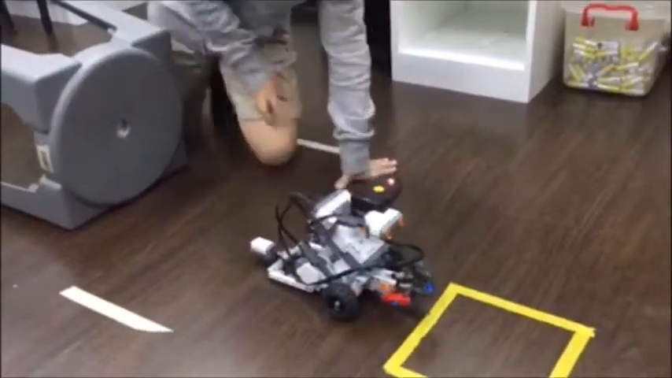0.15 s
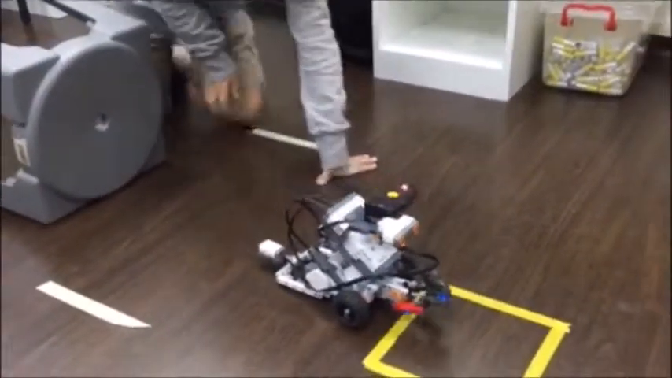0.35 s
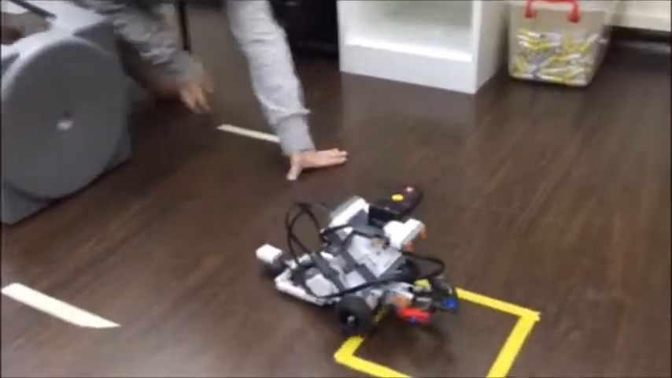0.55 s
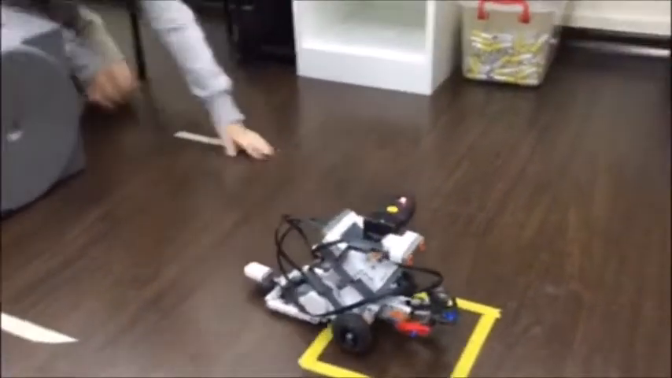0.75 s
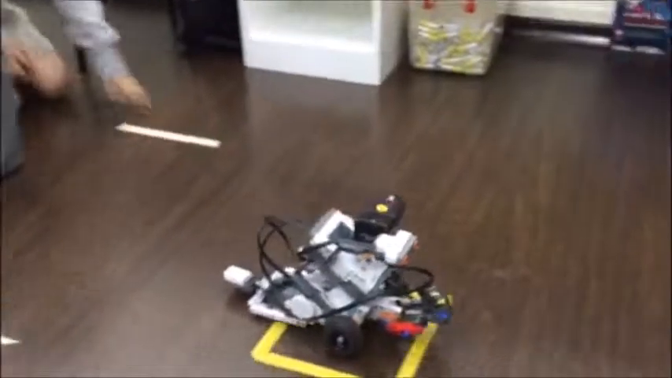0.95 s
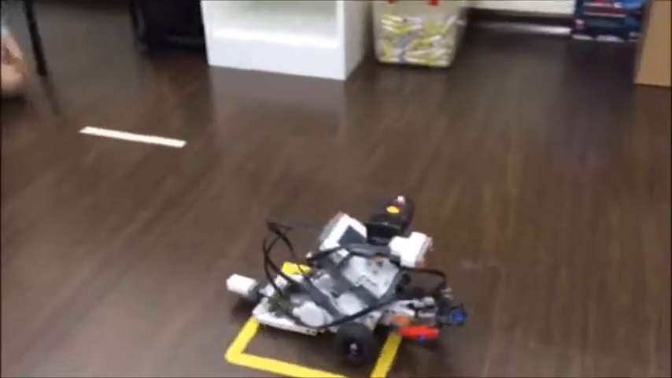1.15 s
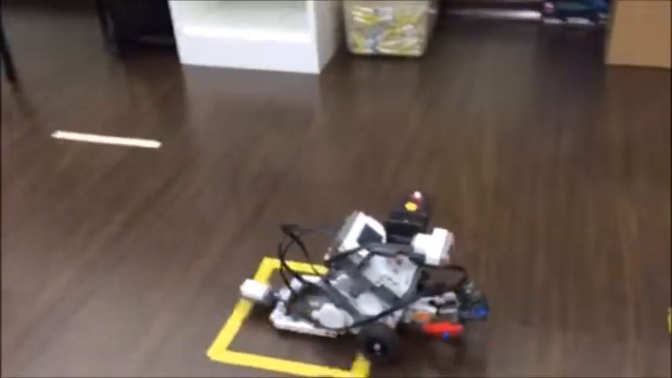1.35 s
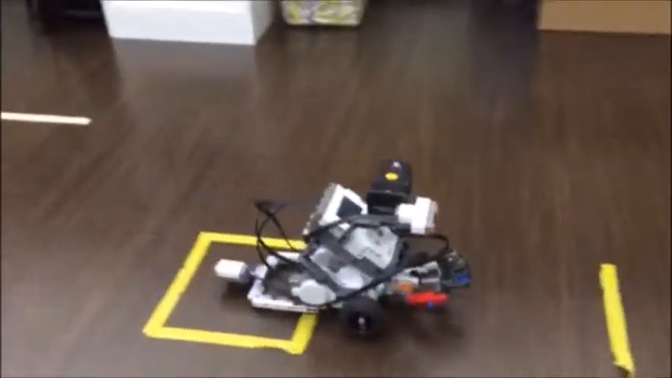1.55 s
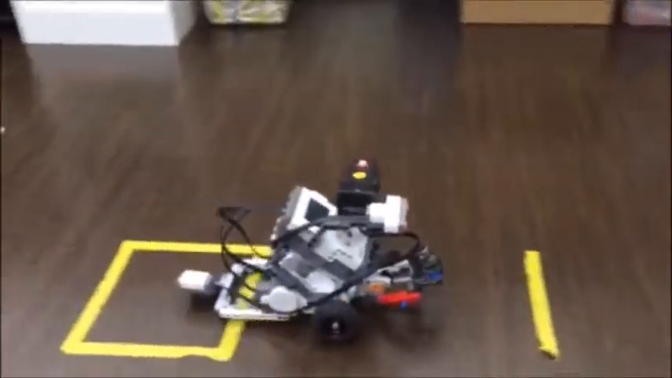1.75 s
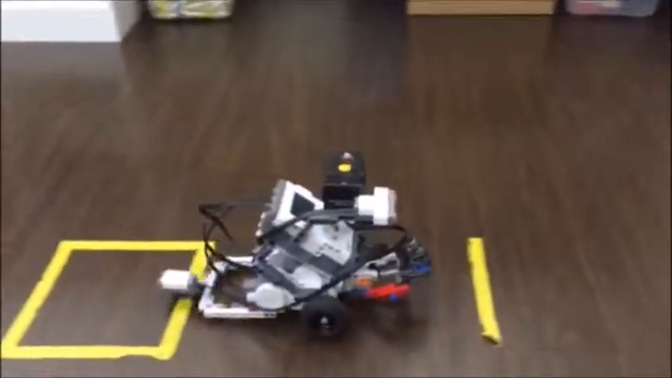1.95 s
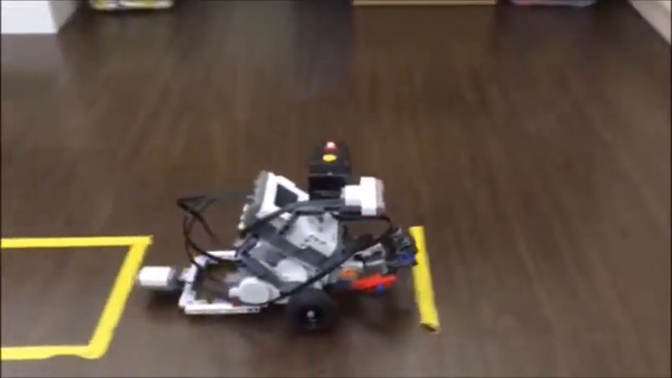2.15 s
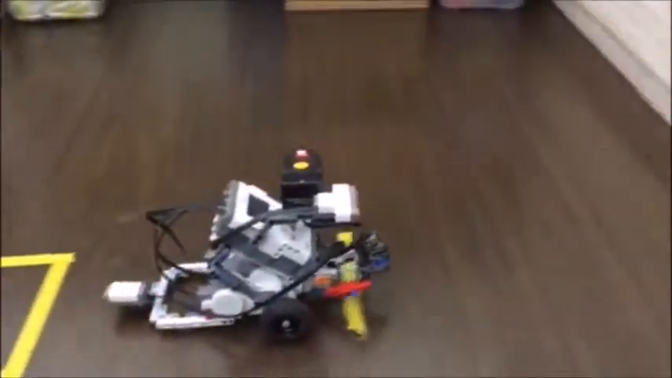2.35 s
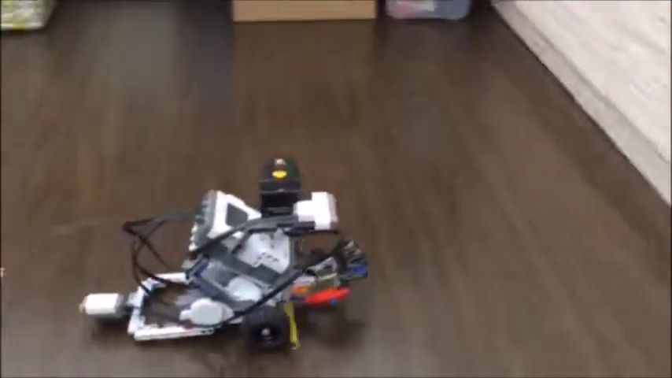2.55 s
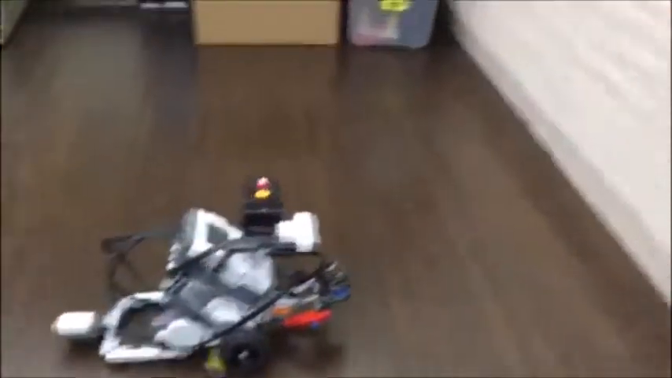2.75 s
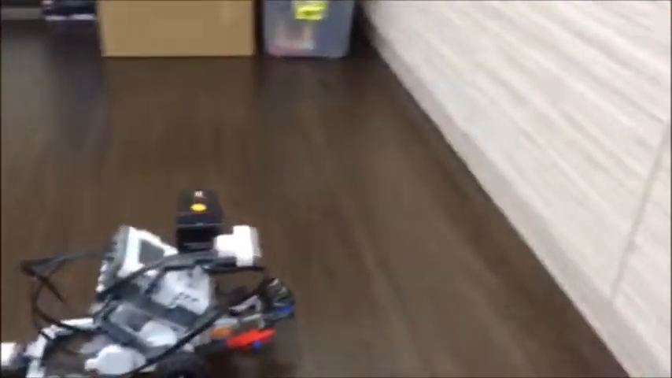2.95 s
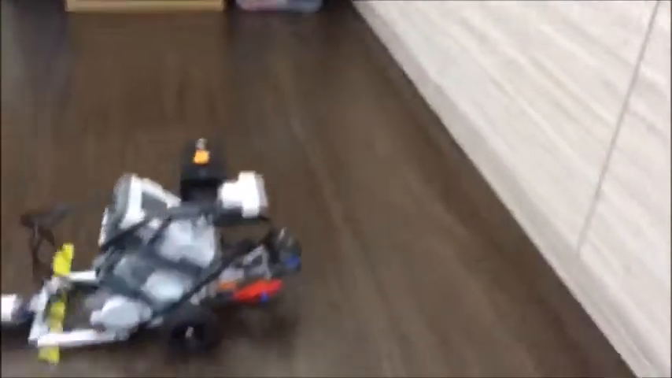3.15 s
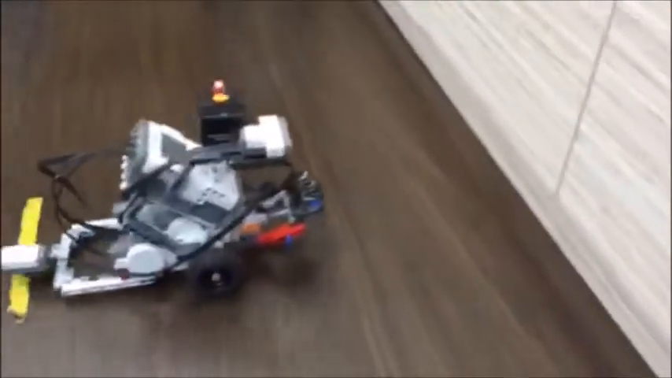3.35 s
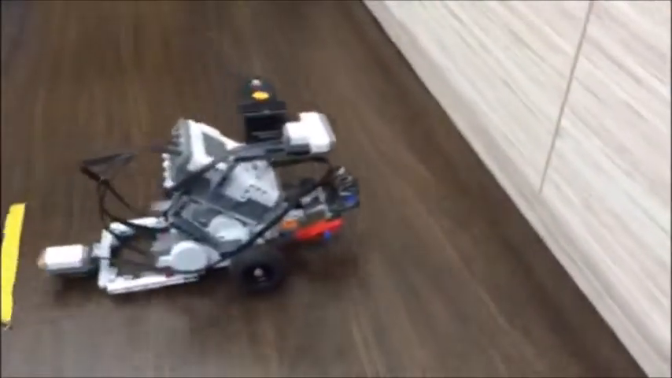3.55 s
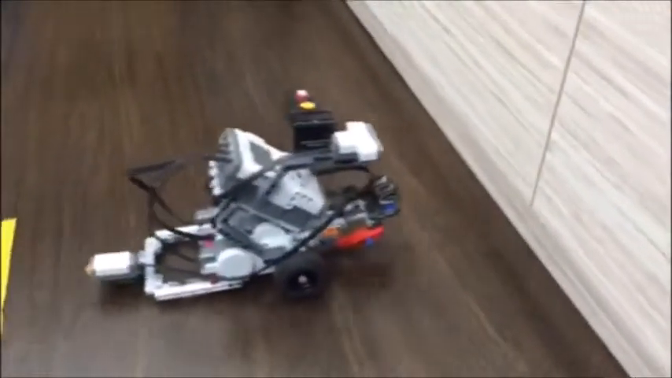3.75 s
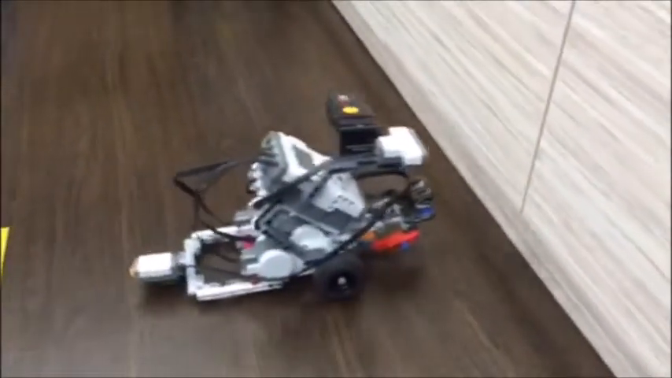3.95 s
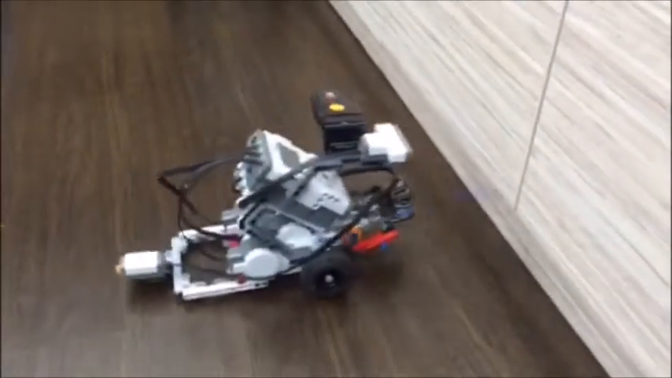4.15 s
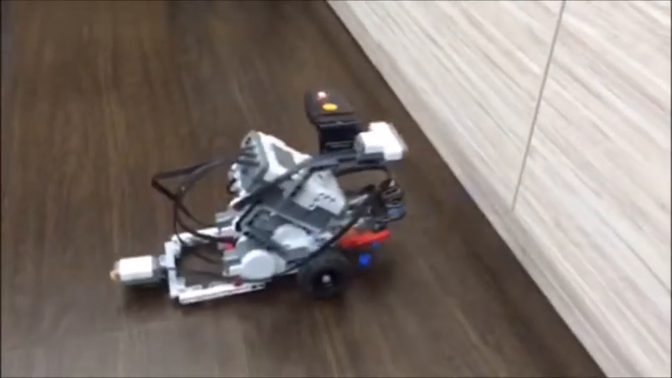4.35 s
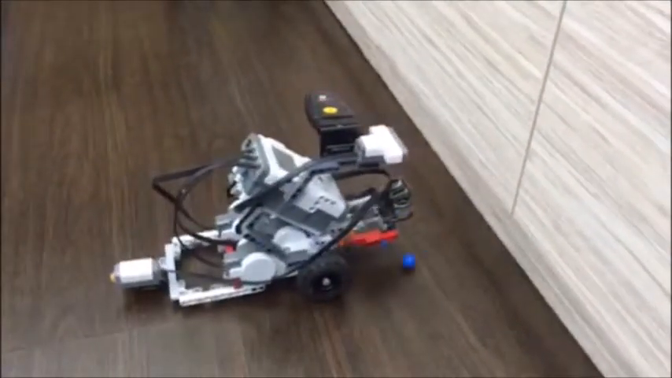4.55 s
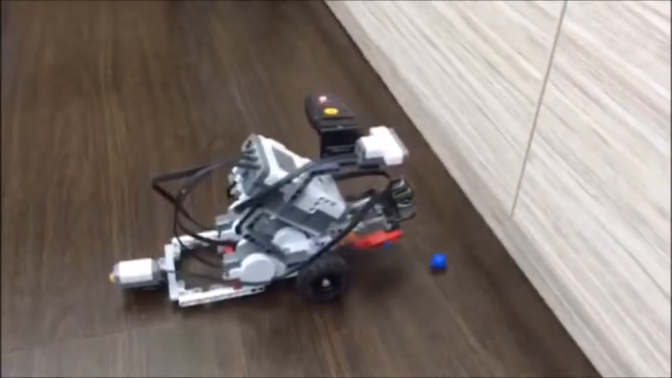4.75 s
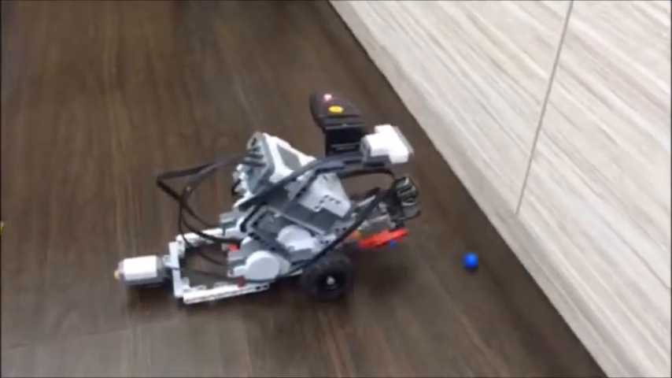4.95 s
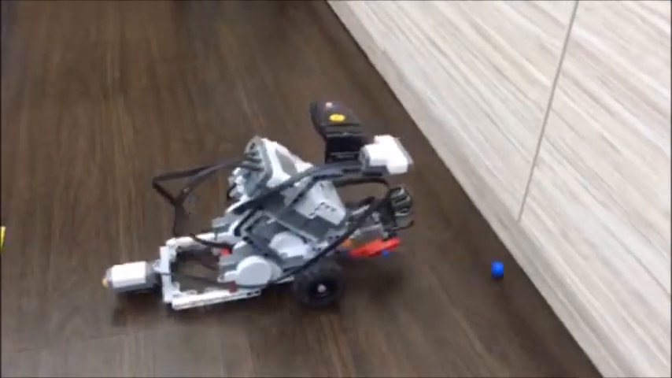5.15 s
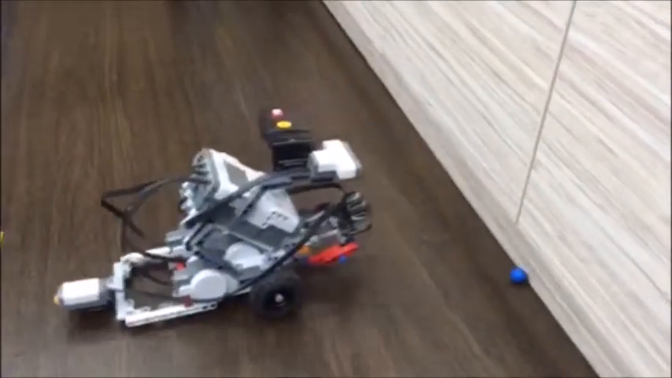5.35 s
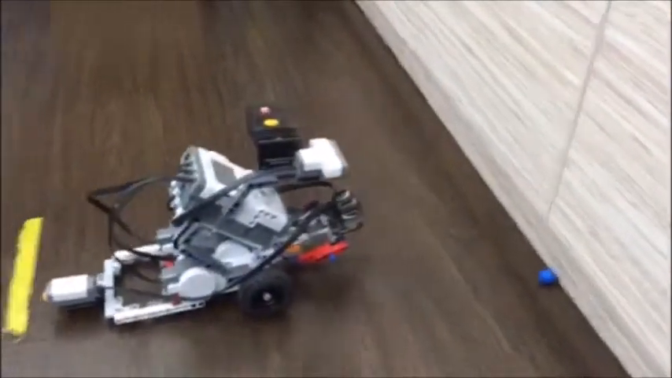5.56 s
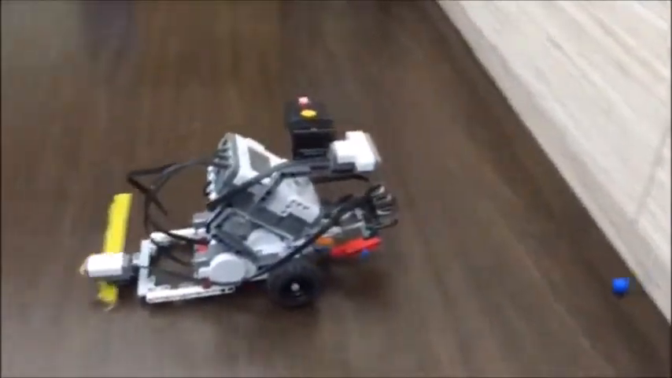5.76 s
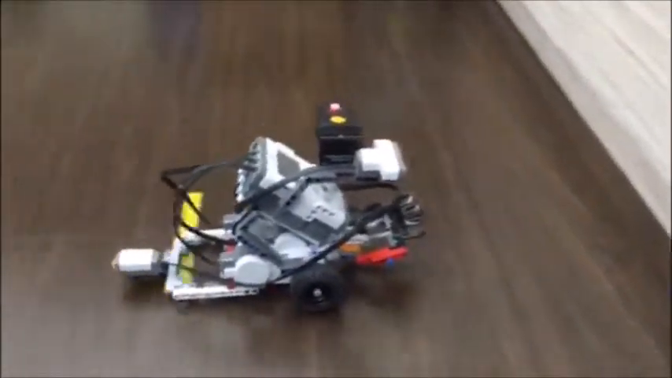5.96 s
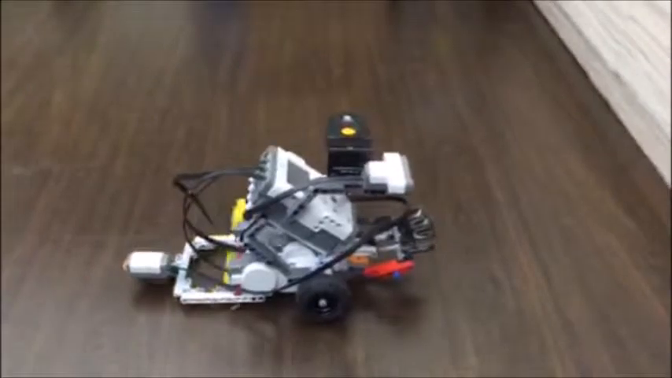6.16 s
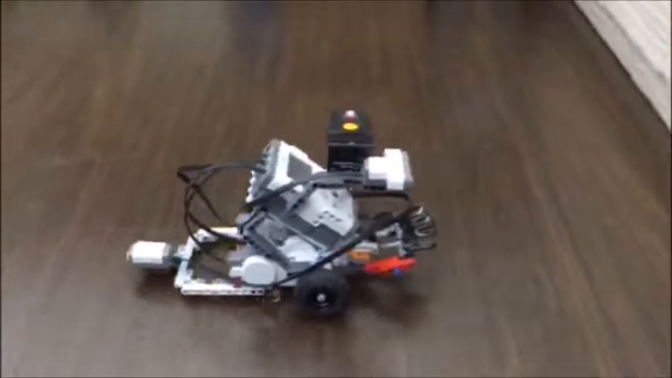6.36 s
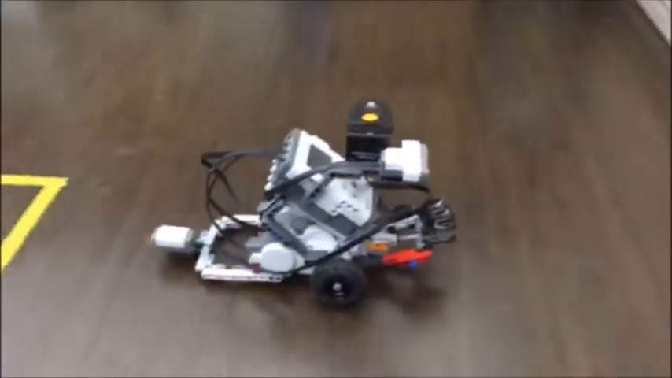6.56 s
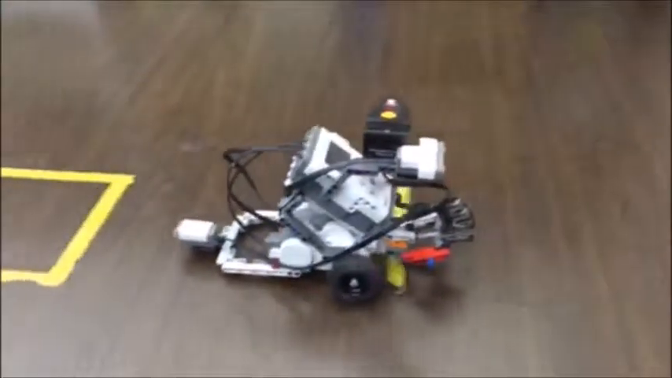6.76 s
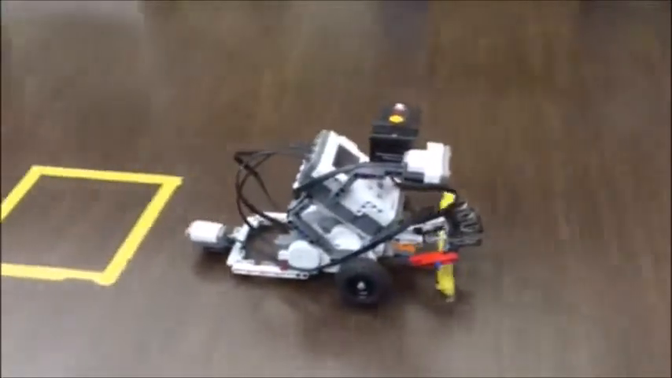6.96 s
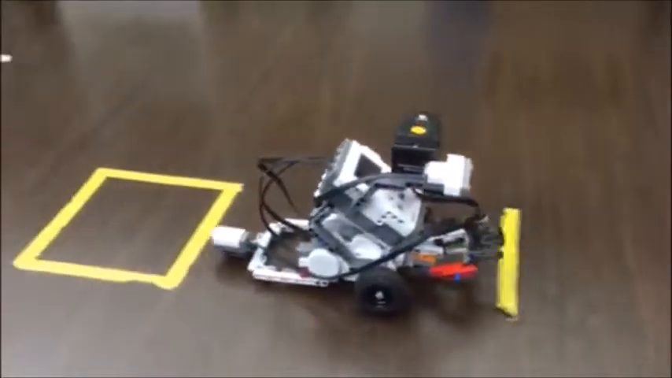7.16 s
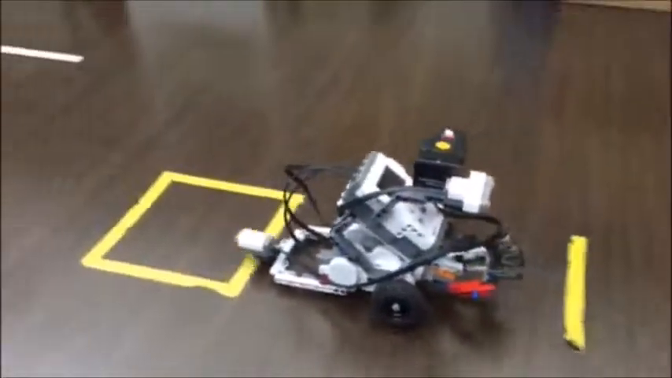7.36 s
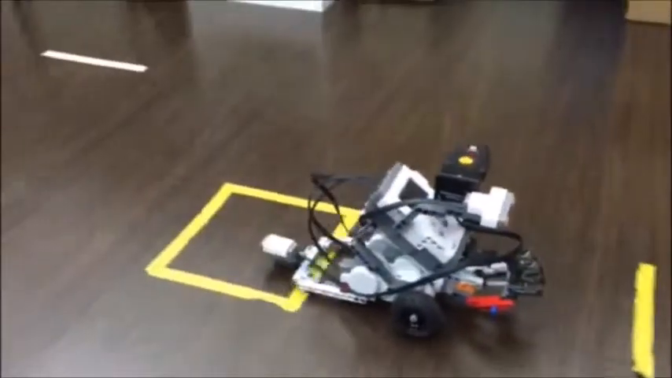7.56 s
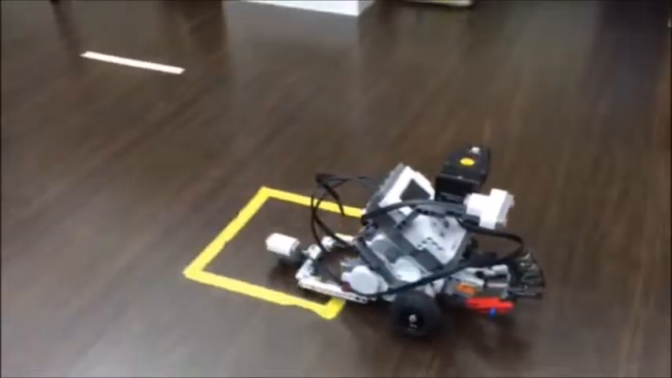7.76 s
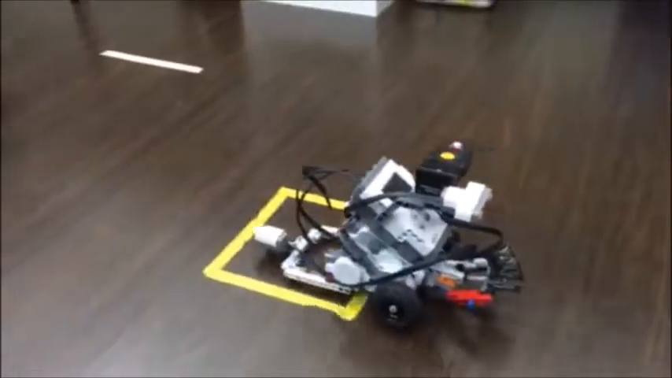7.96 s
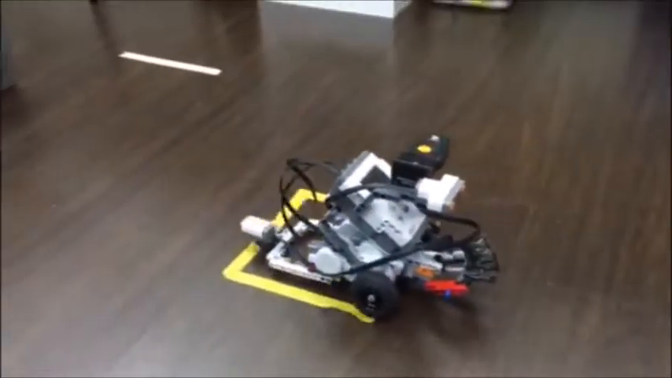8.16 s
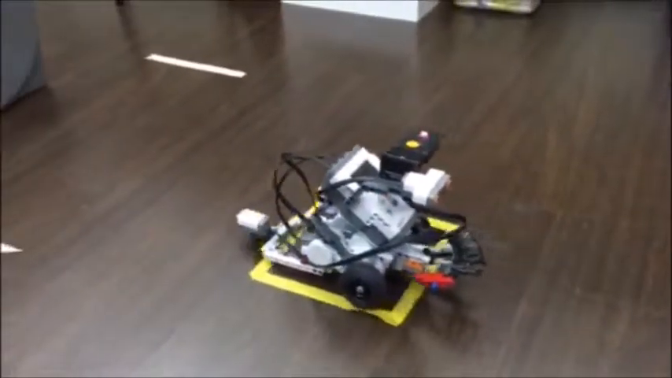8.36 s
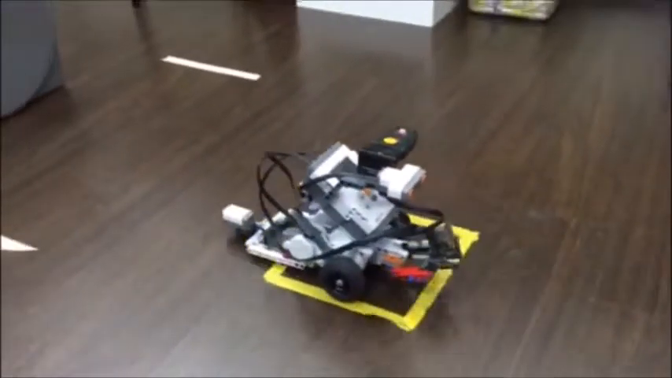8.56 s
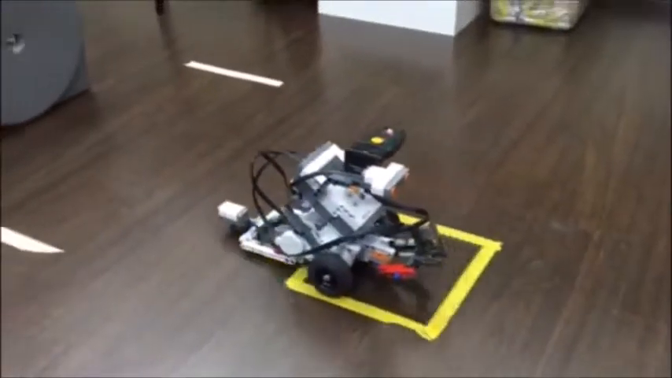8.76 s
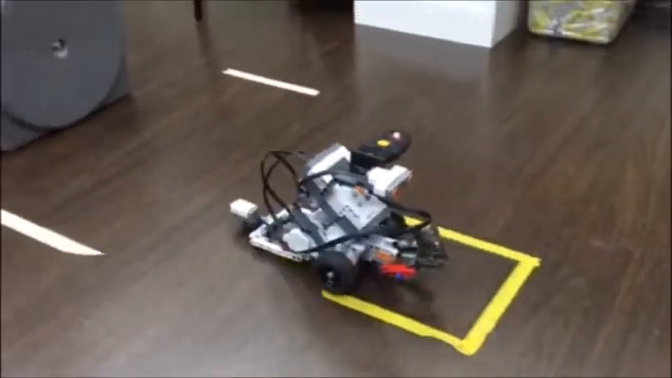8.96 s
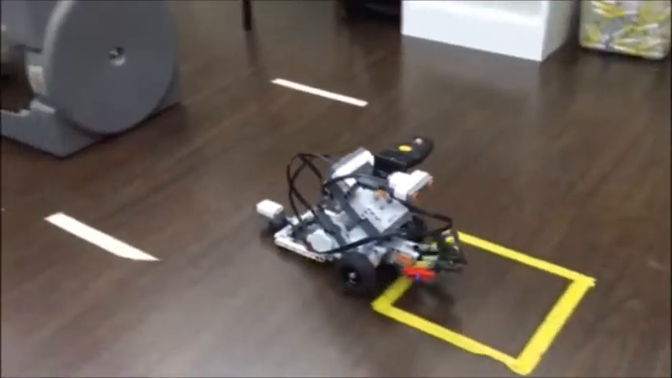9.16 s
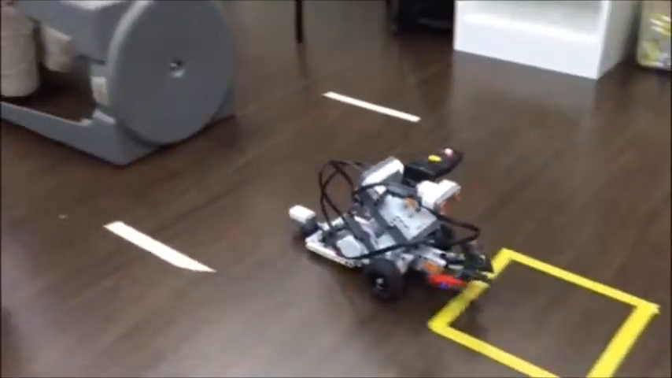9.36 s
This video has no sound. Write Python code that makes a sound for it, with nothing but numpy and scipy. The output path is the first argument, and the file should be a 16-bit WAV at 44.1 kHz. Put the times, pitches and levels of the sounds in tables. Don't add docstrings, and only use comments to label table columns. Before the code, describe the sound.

One microphone near the floor picks up raspy small motors with a wavering gear whine, over low room hum and faint hiss. Someone shifts on the boards with dull knocks. The drive stops, a short motor burst leads to a hard, overloaded snap with quick clattering bounces and a short room echo. The launcher motor sags to rest, a small ball rolls faintly, then reversing motors rasp and whine steadily until the end.

```python
import sys
import numpy as np
from scipy import signal
from scipy.fft import rfft, irfft, next_fast_len
from scipy.io import wavfile
from scipy.ndimage import uniform_filter1d

SR = 44100
rng = np.random.default_rng(int(sys.argv[2]) if len(sys.argv) > 2 else 0)


def master(y):
    cut = np.clip(np.atleast_2d(y).T, -1, 1)
    pcm = np.round(cut * 32767)
    wavfile.write(sys.argv[1], SR, pcm.astype(np.int16))


def field_ratio(decibels):
    return 10 ** (np.asarray(decibels, dtype=float) / 20)


N = 414540

# (frequency [Hz], level [dB per Hz])
HUM_COLOUR = [(15, -48), (25, -55), (41, -7), (70, -5), (102, 1.5), (114, -7), (130, -7), (160, -18),
              (195, -10), (223, -21.5), (259, -22.5), (533, -37.5), (667, -29.5), (786, -34), (900, -29),
              (1170, -109), (1980, -120)]
# (time [s], rasp level [dB], brightness [dB])
FORWARD_EFFORT = [(0.06, -53.5, -3), (0.15, -36.5, -8.5), (0.3, -33, -3.5), (0.7, -33.5, -4),
                  (1.5, -34.5, -2), (2.4, -34, -1), (3.1, -32.5, -3), (3.6, -32.5, -1.5), (4.07, -34, -2.5),
                  (4.1, -47, 0)]
REVERSE_EFFORT = [(5.16, -59, -13), (5.22, -33, -12), (5.36, -29.5, -7), (5.7, -31.5, -7.5),
                  (6.1, -31.5, -8), (6.8, -32, -5), (7.8, -33, -5), (8.35, -31.5, -6.5), (8.8, -33.5, -4),
                  (9.4, -34, -5)]
FORWARD_WHEEL = dict(mesh_hz=752, turn=.636, fastest=2.308, gain=3.4, swing=33.5, fading=.012, lump=3.9, lump_turns=.107, edge=-0.088, edge_turns=.03, slack=.464, spin_up=.168, hunt=-40, hunt_period=.908, hunt_decay=.489, hunt_at=.287)
REVERSE_WHEEL = dict(mesh_hz=647.6, turn=.75, fastest=7.505, gain=4.9, swing=40.0, fading=.041, lump=3.6, lump_turns=-.021, edge=-8.2, edge_turns=-.015, slack=.338, spin_up=.17, hunt=126.0, hunt_period=.206, hunt_decay=.208, hunt_at=.274)
# (frequency [Hz], level [dB per Hz])
FORWARD_RASP = [(350, -64), (600, -31), (735, -22), (877, -32), (1070, -18), (1530, -3), (2460, -4),
                (3090, -7), (3350, -8), (4520, -4.5), (5390, -8.5), (9390, -13.5), (10500, -19),
                (13000, -15.5), (15300, -20.5)]
REVERSE_RASP = [(350, -23.5), (600, -47), (1030, -26), (1300, -10.5), (1980, 0.5), (2290, -5.5), (2890, -3),
                (4460, -6), (4970, -13), (5850, -9.5), (7360, -20), (9780, -15), (12700, -21.5),
                (13900, -28.5), (15300, -28.5)]
LAUNCH_RASP = [(530, -50), (900, -23), (1500, -10.5), (1650, -6.5), (1830, -2.5), (2110, -7.5), (3050, -10),
               (3820, -4), (4410, -7.5), (7600, -15), (10600, -20.5), (13800, -17), (15300, -27)]
# (multiple of tooth rate, level [dB rms], swell per wheel turn [dB], swell peak [turns], change [dB per s])
FORWARD_ORDERS = [(2, -39.5, 0.5, .5, -0.6), (5, -52, 1.5, .3, -1.5)]
REVERSE_ORDERS = [(3, -42, 1.6, 0.064, -0.5), (2, -47.5, 5.0, 0.0068, -0.1),
                  (4.02, -48.5, 2.6, -0.042, -1.5), (4.99, -49, 2.2, .4, -2.8)]
# (multiple of tooth rate, level [dB rms], width [Hz])
FORWARD_LINES = [(1, -61, 14), (1.3, -63, 20), (1.7, -56, 20), (2.3, -52, 25), (2.7, -53, 25), (3, -50, 20),
                 (4, -48.5, 26), (6, -52, 28), (6.3, -54, 40), (7, -57, 40)]
REVERSE_LINES = [(1, -71, 25), (1.3, -72, 25), (2.3, -55, 25), (2.7, -54, 30), (3.3, -54, 30),
                 (4.6, -52, 20), (6, -56, 40), (8.3, -60, 60)]
# (frequency [Hz], width [Hz], boost [dB])
FORWARD_FRAME = [(2300, 150, 4), (3050, 120, 5), (3700, 120, 8), (4450, 200, 7), (5100, 200, 3)]
REVERSE_FRAME = [(1900, 150, 3), (2730, 80, 7), (3000, 90, 7), (3900, 200, 3), (5700, 100, 3)]
# (time [s], half length [s], change [dB])
BEATS = [(.6, 0.035, 5), (.66, 0.036, -13), (.77, 0.044, 4), (1.728, .06, -5.5), (2.26, 0.025, -14),
         (2.6, .13, 5), (2.837, .06, 5.5), (2.96, .05, -8), (3.058, .05, 9), (3.19, .04, -8),
         (3.53, .04, -8), (5.42, .07, 1.5), (5.65, .08, -3.5), (5.95, 0.16, 7), (6.38, .14, -5),
         (6.67, .03, -10), (6.77, .06, 6.5), (7.21, .03, -7), (7.29, .05, 6), (7.42, .04, -8),
         (7.682, 0.078, 5), (8.0, .05, 7), (8.14, .05, -6), (8.28, .07, 5), (8.9, .07, -7), (9.35, .05, 7)]
# (time [s], level [dB])
START_TICK = [
    (0.0655, -33),
]
# (time [s], peak [dB], pitch [Hz], 60 dB decay [s])
KNOCKS = [(0.251, -46, 1190, 0.08), (0.545, -33.5, 522, 0.08), (0.824, -32, 1197, 0.1),
          (1.277, -26.5, 339, 0.14), (1.31, -29, 283, 0.19), (1.72, -33, 1169, 0.076),
          (2.459, -42, 202.7, 0.08), (4.045, -34, 231, 0.076), (4.337, -15.5, 600, 0.078),
          (4.487, -38, 616, 0.08), (5.298, -27.5, 960, 0.11), (5.495, -22.5, 900, 0.17),
          (5.679, -43, 1200, 0.08)]
# (time [s], peak [dB], pitch [Hz], 60 dB decay [s])
THUMP = [
    (4.2823, -8, 620, .1),
    (4.2826, -17.5, 200, .08),
]
# (middle [s], half length [s], low thrum [dB], upper rustle [dB])
SHUFFLES = [(.47, 0.22, -57, -53), (1.02, .18, -55, -58), (1.75, .35, -54, -65), (2.58, .15, -58, -71),
            (2.92, 0.18, -80, -64), (3.55, 0.26, -65, -62.5), (4.08, .14, -57.5, -62.5),
            (4.64, 0.12, -51, -73), (5.15, .2, -56.5, -74), (6.0, .14, -83, -59.5)]
# (frequency [Hz], level [dB per Hz])
THRUM_COLOUR = [(180, -39.5), (240, -0.5), (320, -0.5), (400, -5.5), (520, -46)]
RUSTLE_COLOUR = [(250, -27), (430, -1), (530, 0.5), (580, 3), (663, -4), (714, -0.5), (1100, -9),
                 (1430, -33), (2420, -120)]
# (time [s], pitch [Hz], level [dB])
CREAK = [(0.81, 210, -64), (0.824, 215, -49), (0.856, 298, -51), (0.884, 322, -42), (0.986, 311, -47.5),
         (1.04, 349, -57), (1.07, 353, -61)]
# (time [s], rasp level [dB], brightness [dB])
WIND_UP = [(4.05, -51, -12), (4.1, -33, -5), (4.14, -33, -1), (4.17, -32.5, -3), (4.2, -31.5, -18),
           (4.245, -34, -8), (4.262, -33.5, 0), (4.295, -32, -8)]
SNAP_TIMES = [4.2564, 4.2772, 4.2813, 4.2985, 4.3377, 4.3486, 4.3626, 4.3831]
# (crack peak [dB], treble share [dB], 60 dB decay [s], rattle against crack [dB], crack length [s])
SNAPS = [
    (-25, -2, 0.096, -20, .002),
    (-22, -30, .05, -1.5, 0.0056),
    (9, -10.5, 0.13, -19, 0.0025),
    (-12, -11, 0.12, -5, 0.0019),
    (-.6, -2.5, 0.087, -21.5, 0.0016),
    (-11.5, 6, 0.067, -15, 0.00083),
    (-7.5, -15, 0.14, -10, 0.00054),
    (-1, -3, 0.067, -20, 0.00091),
]
# (frequency [Hz], level [dB per Hz])
SNAP_COLOUR = [(59, -50), (100, -20), (318, -11.5), (436, 1.5), (787, -14), (971, -0.5), (1330, -2.5),
               (1610, -1), (2160, -4), (4240, 0), (5930, -4.5), (6590, -9.5), (15300, -38.5)]
# (frequency [Hz], 60 dB decay [s])
ROOM_DECAY = [(150, 0.17), (500, 0.16), (2000, 0.71), (6000, 0.74), (14000, 0.29)]
# (frequency [Hz], level [dB], width [Hz])
COAST_SING = (3780, -49, 160)
# (time [s], rasp level [dB], brightness [dB])
JERK = [(5.16, -60, -13), (5.19, -42, -14), (5.23, -40, -16), (5.3, -48, -12)]
# (time [s], depth [dB])
SAGS = [(.242, -12), (.906, -20), (1.672, -16), (2.013, -26), (3.889, -13), (4.042, -15), (4.425, -14),
        (6.985, -17), (7.838, -17), (7.986, -15), (8.713, -17), (8.821, -12), (9.224, -19), (9.374, -24)]

COAST_DB = -35.5


def evened(x):
    return x / np.sqrt(np.mean(x ** 2) + 1e-20)


def noise(count):
    return rng.standard_normal(count)


def read(points, hz):
    f, value = np.transpose(points)
    return np.interp(np.log(hz + 1), np.log(f + 1), value)


def add(mix, s, sound):
    part = mix[round(s * SR):][:len(sound)]
    part += sound[:len(part)]


def spread(rows):
    s, *columns = np.transpose(rows)
    t = np.arange(s[0], s[-1], 1 / SR)
    return s[0], [np.interp(t, s, c) for c in columns]


def shaped(x, points):
    size = next_fast_len(len(x) + 2048)
    gain = field_ratio(read(points, np.fft.rfftfreq(size, 1 / SR)))
    return evened(irfft(rfft(x, size) * gain, size)[:len(x)])


def wander(count, hz):
    step = 16
    coarse = uniform_filter1d(noise(count // step + 2), int(SR / step / hz / 4) + 1)
    coarse = signal.lfilter([1], [1, -np.exp(-2 * np.pi * hz * step / SR)], coarse)
    return evened(np.interp(np.arange(count) / step, np.arange(len(coarse)), coarse))


def fade(x, s=0.0024):
    return x * signal.windows.tukey(len(x), min(1, 2 * s * SR / len(x)))


def patchy(x, depth_db, frames=6, bins=2):
    z = signal.stft(x, nperseg=2048, noverlap=1536)[2]
    field = uniform_filter1d(noise(z.shape[::-1]), int(frames), 0)
    field = uniform_filter1d(field, int(bins), 1).T
    return signal.istft(z * field_ratio(depth_db * evened(field)), nperseg=2048, noverlap=1536)[1][:len(x)]


def room_air(mix):
    add(mix, 0, field_ratio(-45.5) * shaped(noise(N), HUM_COLOUR))
    hiss_colour = [(300, 3), (1000, 5), (4000, 4), (15000, -18)]  # Hz, dB per Hz
    add(mix, 0, field_ratio(-65.5) * shaped(noise(N), hiss_colour))


def wheel(t, mesh_hz, turn, fastest, gain, swing, fading, lump, lump_turns, edge, edge_turns,
          slack, spin_up, hunt, hunt_period, hunt_decay, hunt_at):
    angle, since = (t - fastest) / turn, t - t[0]
    missing = slack * np.exp(-(since / spin_up) ** 2)
    wobble = swing * np.exp(-fading * angle) * np.cos(2 * np.pi * angle)
    wobble += lump * np.cos(4 * np.pi * (angle - lump_turns))
    wobble += edge * np.cos(6 * np.pi * (angle - edge_turns))
    hunting = hunt * np.exp(-since / hunt_decay) * (1 - missing / slack)
    hunting *= np.cos(2 * np.pi * (since - hunt_at) / hunt_period)
    speed_hz = mesh_hz + gain * (t - fastest) + wobble + hunting
    return speed_hz * (1 - missing), angle, missing


def lit(hz, frame):
    return sum(gain_db / (1 + ((hz - centre) / wide) ** 2) for centre, wide, gain_db in frame)


def rasp(level_db, bright_db, colour, turns):
    count = len(turns)
    beat = 1 + .3 * np.cos(2 * np.pi * turns)
    beat *= 1 + .15 * sum(np.cos(2 * np.pi * (k * turns / 10 + rng.random())) for k in (1, 2, 3))
    flutter_db = .8 * wander(count, 150) + 0.2 * wander(count, 4.4)
    grit = noise(count) * beat * field_ratio(flutter_db)
    teeth = np.floor(turns).astype(int)
    tap_size = noise(10)[teeth % 10] + 0.13 * noise(count)
    taps = np.diff(teeth, prepend=0) * tap_size
    grit = shaped(patchy(grit + .25 * evened(taps), 3.0), colour)
    treble = signal.sosfiltfilt(signal.butter(3, 6500, "high", fs=SR, output="sos"), grit)
    return field_ratio(level_db) * (evened(grit - treble) + field_ratio(bright_db) * evened(treble))


def whine(turns, multiple, db, width_hz, flutter_db=3.5):
    drift = np.cumsum(width_hz * wander(len(turns), 40.0)) / SR
    waver_db = flutter_db * (wander(len(turns), 25) + .6 * wander(len(turns), 4) - .6)
    return np.sqrt(2) * field_ratio(db + waver_db) * np.cos(2 * np.pi * (multiple * turns + drift))


def drive(rows, wheels, colour, lines, frame, rasp_db, orders, twin_order, twin_db, twin_lag):
    s, (level_db, bright_db) = spread(rows)
    t = np.arange(len(level_db)) / SR
    mesh_hz, angle, missing = wheel(s + t, **wheels)
    turns = np.cumsum(mesh_hz) / SR
    effort_db = level_db - np.median(level_db)
    buried_db = -48 * missing
    out = rasp(level_db + rasp_db, bright_db - rasp_db, colour, turns)

    beat_db = sum(db * np.exp(-((s + t - at) / half) ** 2) for at, half, db in BEATS)
    for k, db, swell_db, peak, slope_db in orders:
        order_db = db + swell_db * np.cos(2 * np.pi * (angle - peak)) + slope_db * (t - t.mean())
        order_db += buried_db + lit(k * mesh_hz, frame) + np.minimum(effort_db + 1, 0)
        if k == orders[0][0]:
            order_db += beat_db
        out += whine(turns, round(k), order_db, 1.1 * k * k, flutter_db=.7 * k)
    for k, db, width_hz in lines:
        out += whine(turns, k, db + effort_db + buried_db + lit(k * mesh_hz, frame), width_hz)

    twin_turns = np.cumsum(np.interp(t - twin_lag, t, mesh_hz)) / SR
    slow_db = np.minimum(0, 90 * (mesh_hz / np.median(mesh_hz) - .9))
    out += whine(twin_turns, twin_order, twin_db + effort_db + buried_db + slow_db, 15.7, flutter_db=6.0)
    return s, fade(out)


def start_tick(mix):
    t = np.arange(8000) / SR
    for s, db in START_TICK:
        add(mix, s, field_ratio(db - 60 * t / 0.0074) * evened(np.diff(noise(len(t) + 2), 2)))


def knocks(mix):
    t = np.arange(8000) / SR
    rise = 1 - np.exp(-t / 0.0011)
    for s, db, hz, t60 in KNOCKS + THUMP:
        band = [(40, -40), (max(hz - 400, 90), -8), (hz, 0), (hz + 800, -7), (4000, -13.5), (12000, -40)]
        decay = field_ratio(db - 5.0 - 60 * t / np.clip(t60, .01, 1))
        add(mix, s, decay * rise * shaped(noise(len(t)), band))


def rubbing(mix):
    t = np.arange(round(6.5 * SR)) / SR
    thrum = sum(field_ratio(low_db - 7.6 * ((t - s) / half) ** 2) for s, half, low_db, _ in SHUFFLES)
    rustle = sum(field_ratio(up_db - 7.6 * ((t - s) / half) ** 2) for s, half, _, up_db in SHUFFLES)
    rustle += ball_roll(t)
    for gain, colour in ((thrum, THRUM_COLOUR), (rustle, RUSTLE_COLOUR)):
        add(mix, 0, field_ratio(-3.0) * gain * patchy(shaped(noise(len(t)), colour), 2.92, 5.2, 1.8))


def creak(mix):
    s, (hz, db) = spread(CREAK)
    add(mix, s, fade(whine(np.cumsum(hz) / SR, 1, db, 4, flutter_db=1.2)))


def motor_burst(rows, mesh_hz, colour):
    s, (level_db, bright_db) = spread(rows)
    return s, fade(rasp(level_db, bright_db, colour, np.arange(len(level_db)) * mesh_hz / SR), 0.01)


def snaps(mix):
    t = np.arange(8000) / SR
    for s, (db, treble_db, t60, rattle_db, length) in zip(SNAP_TIMES, SNAPS):
        burst = shaped(noise(len(t)), SNAP_COLOUR)
        burst += field_ratio(treble_db) * evened(np.diff(burst, 2, prepend=[0, 0]))
        crack = burst * np.exp(-(t / length) ** 2)
        rattle = burst * field_ratio(rattle_db - 60 * t / np.clip(t60, .01, 1))
        add(mix, s, field_ratio(db) * (crack / abs(crack).max() + rattle))


def room(x):
    hz, t, z = signal.stft(noise(SR // 2), SR, nperseg=256)
    decay = field_ratio(-60 * t / read(ROOM_DECAY, hz)[:, None])
    tail = signal.istft(z * decay, SR, nperseg=256)[1]
    tail[:200] = 0
    return signal.fftconvolve(x, tail / np.linalg.norm(tail))[:N]


def coasting():
    start, stop, ring, rise = 4.41, 5.07, .1, .09
    s = np.linspace(start, stop + ring, num=80)
    drop_db = -14.5 * ((s - start) / (stop - start)) ** 2.17
    ring_db = -18 * np.sqrt(np.maximum(s - stop, 0) / ring)
    rise_db = -9 * np.maximum(1 - (s - start) / rise, 0)
    return np.transpose([s, COAST_DB + drop_db + ring_db + rise_db, -3 + 1.63 * drop_db])


def singing(rows, shell_hz, db, width_hz):
    s, (level_db, _) = spread(rows)
    turns = np.arange(len(level_db)) * shell_hz / SR
    return s, fade(whine(turns, 1, db + 0.74 * (level_db - COAST_DB), width_hz))


def ball_roll(t):
    start, wall = 4.43, 5.55
    rolling = uniform_filter1d(1. * (t > start) * (t < wall), size=2000)
    return field_ratio(-41.5 - 17 * (t - start)) * rolling


def scene():
    mix, blows = np.zeros(N), np.zeros(N)
    room_air(mix)
    add(mix, *drive(FORWARD_EFFORT, FORWARD_WHEEL, FORWARD_RASP, FORWARD_LINES, FORWARD_FRAME, rasp_db=-0.5,
                    orders=FORWARD_ORDERS, twin_order=2, twin_db=-52.0, twin_lag=.07))
    start_tick(mix)
    knocks(mix)
    rubbing(mix)
    creak(mix)
    add(mix, *motor_burst(WIND_UP, 900, LAUNCH_RASP))
    snaps(blows)
    mix += blows + field_ratio(-7.5) * room(blows)
    add(mix, *motor_burst(coasting(), 600, LAUNCH_RASP))
    add(mix, *singing(coasting(), *COAST_SING))
    add(mix, *motor_burst(JERK, 540, REVERSE_RASP))
    add(mix, *drive(REVERSE_EFFORT, REVERSE_WHEEL, REVERSE_RASP, REVERSE_LINES, REVERSE_FRAME, rasp_db=-1.5,
                    orders=REVERSE_ORDERS, twin_order=3, twin_db=-50.0, twin_lag=.14))
    return np.array([mix, mix])


def thin_out(x):
    hz, t, z = signal.stft(x, SR, nperseg=512, noverlap=384)
    sink_db = sum(db * np.exp(-((t - s) / 0.011) ** 4) for s, db in SAGS)
    weak = abs(z) < field_ratio(-9) * np.percentile(abs(z), 98, axis=0)
    return signal.istft(z * field_ratio(weak * sink_db), SR, nperseg=512, noverlap=384)[1][:N]


def band_limit(x):
    return signal.sosfilt(signal.butter(12, 15460, fs=SR, output="sos"), x)


def record(dry):
    clipped = np.clip(thin_out(dry[0]), -1, 1)
    low_pass = signal.firwin(511, 15400, window=("kaiser", 9), fs=SR)
    limited = signal.oaconvolve(clipped, low_pass, "same")
    return band_limit(np.array([limited, limited]))


dry = scene()
out = record(dry)
master(out)
```